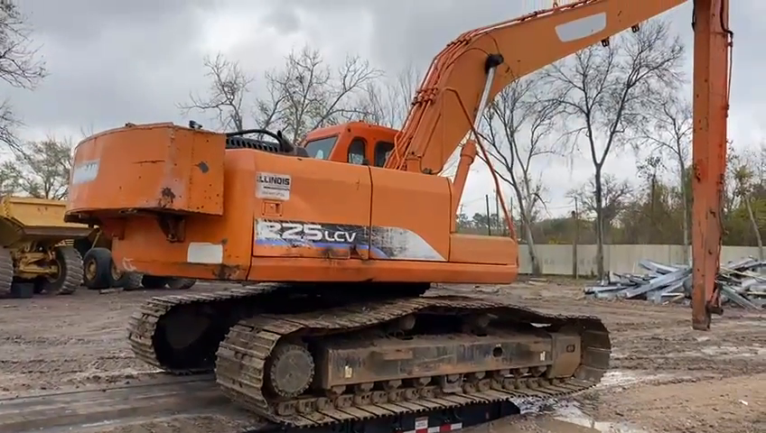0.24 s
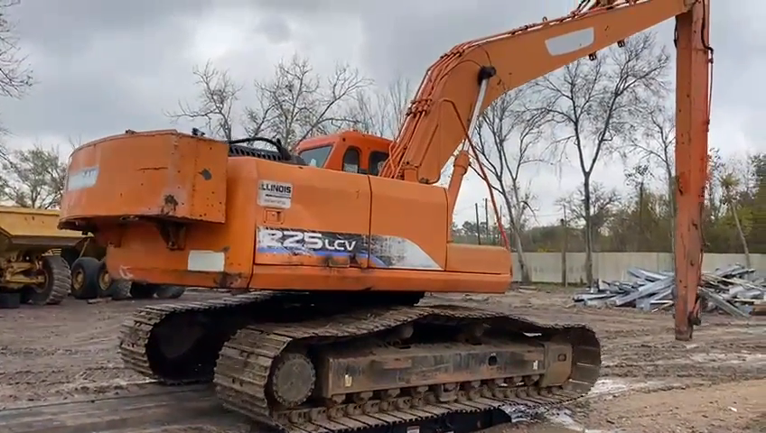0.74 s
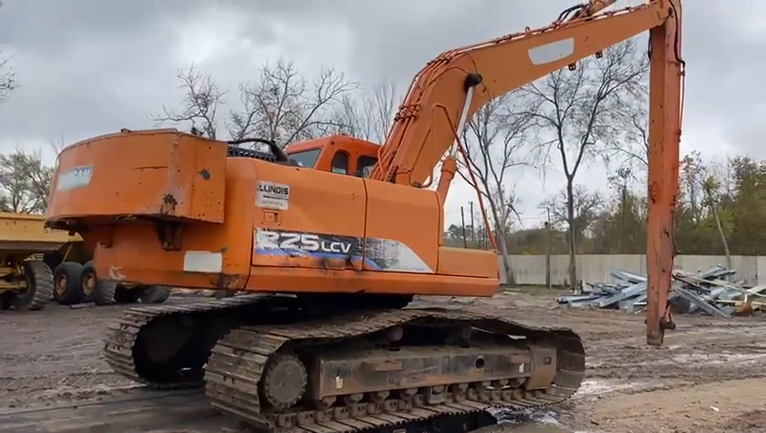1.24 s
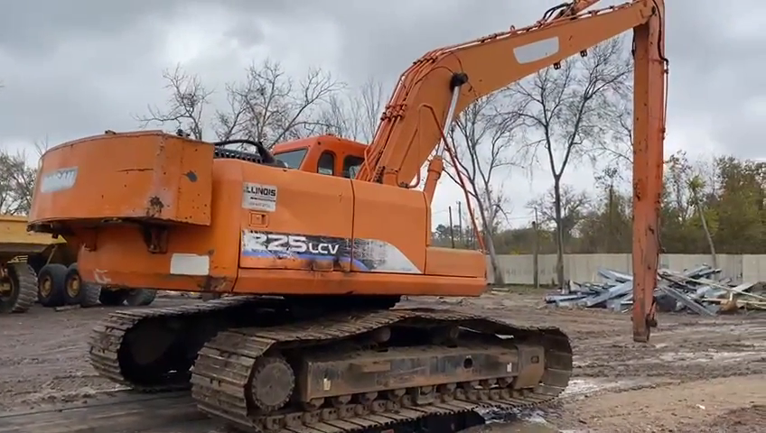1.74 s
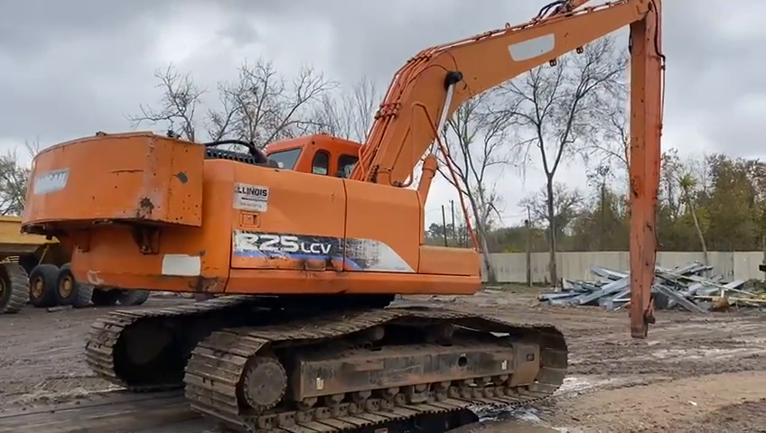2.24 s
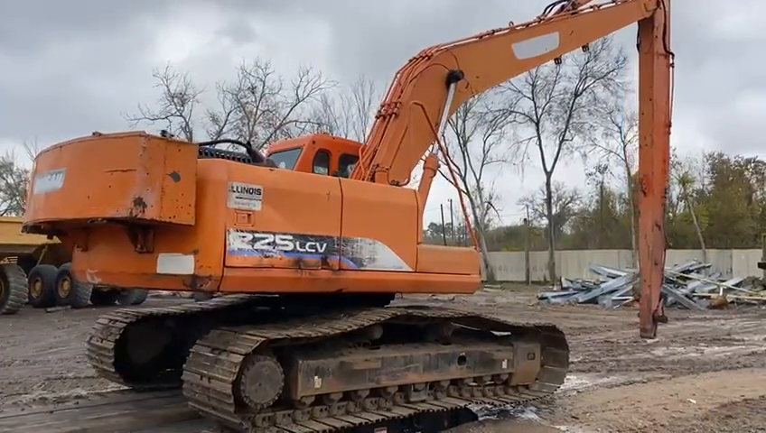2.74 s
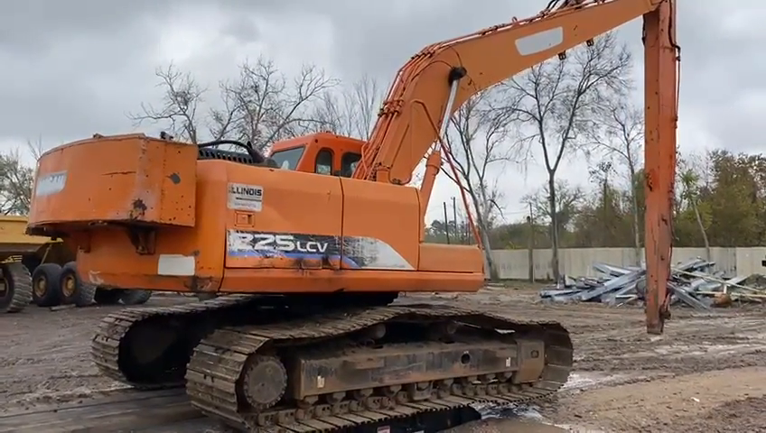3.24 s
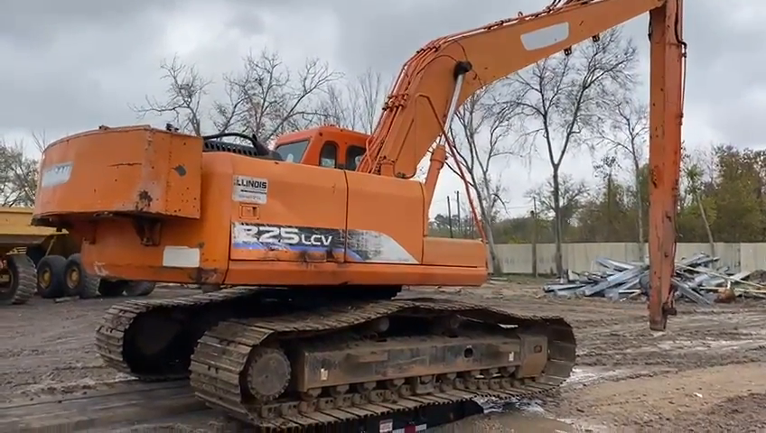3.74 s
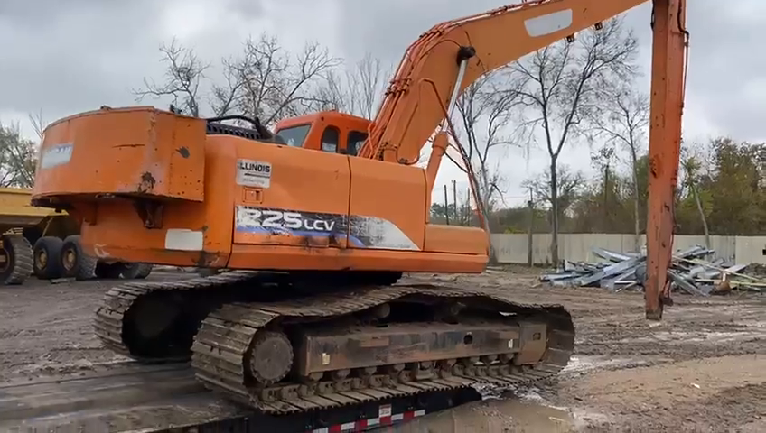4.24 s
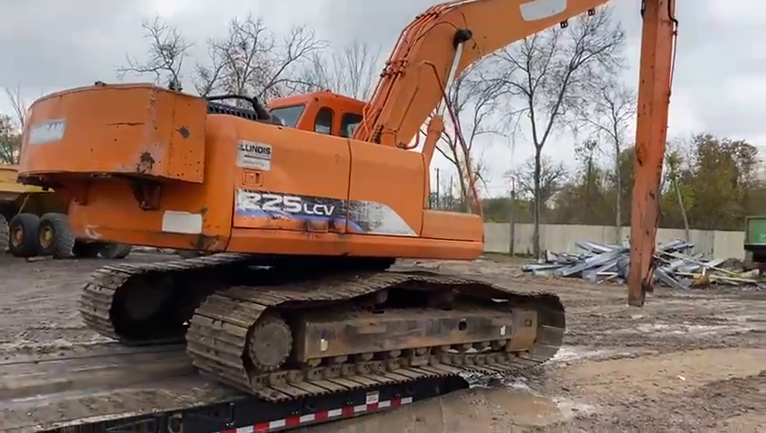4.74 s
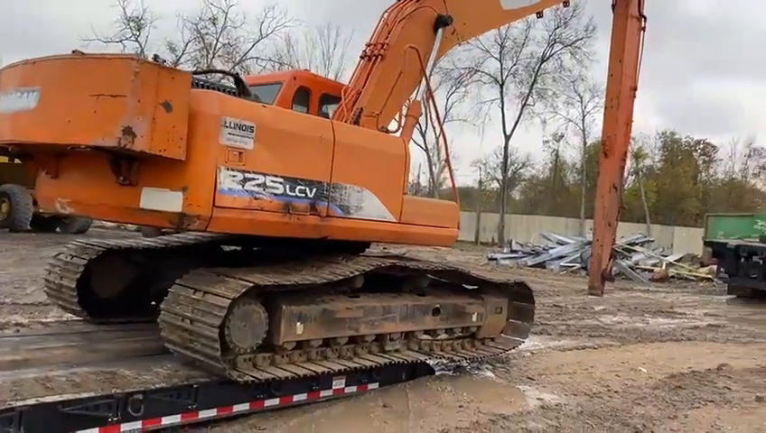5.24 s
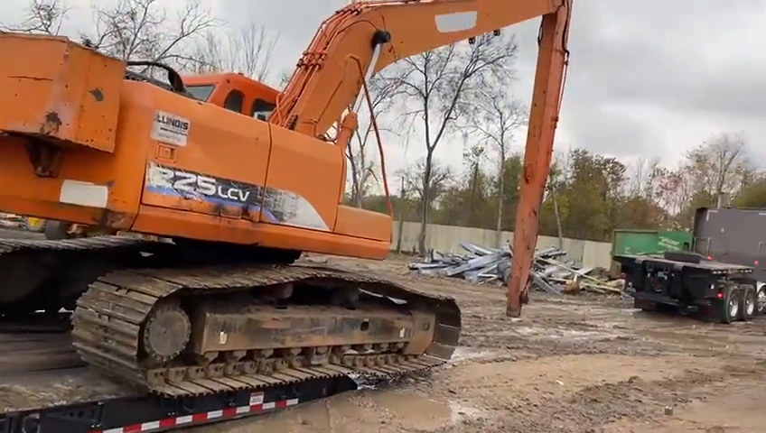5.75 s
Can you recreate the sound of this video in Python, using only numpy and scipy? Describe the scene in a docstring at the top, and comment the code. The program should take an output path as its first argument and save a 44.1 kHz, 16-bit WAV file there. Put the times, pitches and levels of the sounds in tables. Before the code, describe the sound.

A heavy diesel engine runs at constant speed for the whole six seconds: low fan roar, slightly uneven exhaust throbbing and a steady pump hum, outdoors and fairly close, in stereo. A light clank at 0.3 seconds leads to a dense, loud clatter of track steel from 0.64 to 0.9, with hollow deck booms and a brief thin plate ring. Another hard clank lands at 1.1, then smaller ticks fade by 1.6. From there a faint, wavering hydraulic whine rises over the engine. At 2.85 the track drops with a sharp clank and the whine turns lower, fading around 3.5. A deep soft boom at 4.3 accompanies a short second whine, and knocks follow at 4.6 to 4.7. From 5.0 onward rumble and gritty grinding swell, with clustered clanks near 5.3, deep thumps, and duller blows from 5.6 to 5.9.

```python
"""An open yard: a six-cylinder diesel excavator crawls off a low trailer, heard through a two-port microphone.
Noise makes the fan roar, sines the shaft orders, pump hum and track-motor whine; filtered pulses thump
in the exhaust. Coloured noise grinds and rumbles as the weight shifts, dying rings let the deck boom
and thin plates sing, and bursts of noise through steel resonances let the track shoes clank."""
import sys
import numpy as np
from scipy import signal
from scipy.fft import rfft, irfft, next_fast_len
from scipy.io import wavfile
from scipy.ndimage import uniform_filter1d

SR = 44100
rng = np.random.default_rng(int(sys.argv[2]) if len(sys.argv) > 2 else 0)


def nominal_scale(level):
    """Amplitude ratio for a level in decibels (scalar or array-like)."""
    x = np.asarray(level, float) / 20
    return 10 ** x


def master_out(mix):
    """Clip the mix to full scale and print it as 16-bit PCM to the path in sys.argv[1]."""
    frames = np.transpose(np.atleast_2d(mix))
    ceiling = np.clip(frames, -1, 1)
    pcm = np.round(ceiling * 32767).astype(np.int16)
    wavfile.write(sys.argv[1], SR, pcm)


N = 265021
T = np.arange(N) / SR
TURN_HZ, PISTON_HZ = 23.44, 370  # engine shaft; settled piston rate of the track motor

# fan and engine block roar: f/Hz, relative level/dB
ROAR_SPECTRUM = [(15, -46), (25, -46), (55, -3), (120, -1.5), (225, -19.5), (290, -29), (480, -55),
                 (1000, -18.5), (2000, -29), (4000, -78), (8000, -40), (11500, -45.5), (13000, -89)]
# engine and pump tones: multiple of the shaft turn, relative level/dB
SHAFT_ORDERS = [(1, -22), (2, -31), (3, -2.5), (4, 3.5), (5, 7), (6, -2.5), (7, -35), (8, -5.5), (9, -20),
                (11, -0.5), (12, 4.5), (13, -1), (15, -4.5), (16, -6), (17, -7.5), (19, -15.5), (20, -19),
                (24, -6.5), (25, -13.5)]
# six cylinders in firing order, one thumps hardest: relative level/dB
CYLINDER_LEVELS = [-0.5, 2, 4, -3, 2.5, -29]
# exhaust resonances: f/Hz, width/Hz, relative level/dB
EXHAUST_MODES = [(110, 97, 0), (281, 76, -16.5)]
# crawling over the deck, three colours of noise: f/Hz, relative level/dB
RUMBLE_SPECTRUM = [(30, -58), (60, 2), (110, 1), (200, -3.5), (320, -9.5), (500, -50)]
GRIND_SPECTRUM = [(200, 1.5), (400, 6.5), (800, 2), (1500, -6.5), (2500, -31)]
GRIT_SPECTRUM = [(1200, -3.5), (2200, 0), (4500, -6), (8000, -15.5), (11500, -34), (13000, -44)]
# rows rumble, grind, grit: level at load 0/dB, slope/dB per dB of load, rise while the motor pulls/dB
CRAWL_LEVELS = [(-26.5, 1.19, 0), (-33, 1.165, 1), (-40.5, 1.04, 2)]
# weight shifting on the trailer: t/s, load/dB
WEIGHT_SHIFT = [(0, 1), (.37, 0), (.67, 3), (1.0, 2.5), (1.4, 1), (2.3, 0), (3.0, 1), (3.4, 0.5), (3.9, 1),
                (4.5, 2.5), (5.0, 5.5), (5.3, 6.5), (5.75, 6.5), (6.0, 6)]
# pulls of the track motor: start t/s, let-go t/s, level/dB, excess piston rate at the start f/Hz, settling t/s
MOTOR_PULLS = [(1.618, 3.197, -50, 10, .3), (4.175, 4.602, -52, 4.2, 0.34)]
# whine: multiple of the piston rate, level/dB, slope/dB per dB of shrillness,
# level change once the track settles/dB (the fifth multiple swells, the others fade)
WHINE_TONES = [(3, 12, .1, -3), (5, 0, .1, 7), (8, 3.5, 1.5, -20), (9, -1.5, .2, -20)]
# how shrill the whine is: t/s, shrillness/dB
SHRILLNESS = [(1.6, -10), (1.85, -5), (2.02, 1), (2.14, -2), (2.22, 2.5), (2.36, 2.5), (2.46, -3),
              (2.57, -1.5), (2.65, 3), (2.79, 2), (2.84, -2), (4.2, 0), (4.28, 4), (4.42, -6), (4.7, -10)]
# the track drops into place and the whine turns lower: fade-in start and end t/s, fade-out start and end t/s
SETTLED_TIMES = (2.83, 2.88, 3.6, 3.7)
# ringing modes of the trailer deck and, from 3400 Hz up, of thin loose plates: f/Hz, relative level/dB, t60/s
DECK_MODES = [(75, 6.5, 0.1), (101, 1.5, 0.16), (111.3, 0, 0.11), (143, -0.5, 0.16), (170.3, 0.5, 0.19),
              (190, -7, 0.18), (216, -5.5, 0.51), (252, 0, 0.29), (315, 2, 0.2), (346, -2, 0.35),
              (440, -3, .2), (3400, 4, 0.14), (4180, -9, 0.17), (7380, -5.5, 0.3)]
# blows on the deck and plates: t/s, level/dB, centre f/Hz, spread/octaves, rise t/s
DECK_BLOWS = [(0.661, -5, 110, .15, 0.015), (.722, -6.5, 300, 0.74, 0.0046), (0.727, 0, 130, 0.39, 0.0072),
              (0.772, -11, 292, 0.48, 0.0048), (0.801, -8, 128, 0.56, 0.005),
              (0.789, -20, 7380, 0.23, 0.011), (.83, -23, 3400, .4, 0.0096),
              (0.991, -6.5, 130, 0.49, 0.015), (1.012, -8.5, 198, 0.32, 0.0057),
              (1.03, -10.5, 190, 0.77, 0.0056), (1.052, -7.5, 113, 0.25, 0.0031),
              (1.079, -13.5, 263, .3, .004), (1.343, -12, 135, .15, .0055), (2.86, -6, 216, .08, 0.0039),
              (4.293, 4, 104, 0.087, 0.026), (5.061, -5, 101, .08, 0.05), (5.13, -6.5, 75, .1, 0.018),
              (5.258, -1, 123, 0.21, 0.027), (5.384, 4, 101, 0.075, 0.036), (5.618, -10, 111, 0.16, 0.014),
              (5.612, -3.5, 440, .1, .004), (5.642, -13.5, 440, .1, .004), (5.739, -10, 157, 0.21, 0.0021),
              (5.803, -3, 113, 0.12, 0.015), (5.881, -8, 110, .15, 0.0057)]
# ringing modes of the track steel: f/Hz, width/Hz, relative level/dB
STEEL_MODES = [(362, 59, 11), (437.5, 18, 11), (470, 28, -2), (573, 54, 4.5), (654, 29, 3), (686, 51, -2),
               (744, 22, 1.5), (800, 41, -3), (855, 36, -3), (917, 43, -2), (960, 39, 2.5),
               (1057, 36, -4.5), (1179, 63, -6), (1274, 59, -6), (1380, 18, 1), (1565, 21, -1),
               (1795, 29, 3), (1970, 44, -2), (2094, 35, 1), (2190, 28, -5), (2298, 30, 0.5),
               (2710, 60, -3), (3400, 28, 9.5), (3120, 54, 3), (3770, 78, 2), (4210, 82, 1),
               (4400, 120, -6), (5170, 110, -0.5), (5800, 40, -21)]
# track shoe blows: t/s, level/dB, strongest ring f/Hz, upper ring f/Hz,
# tilt near 2 kHz/dB, tilt near 5 kHz/dB, rattle t60/s
SHOE_BLOWS = [(0.323, -18.5, 686, 1274, -15, -27, 0.097), (0.64, -12, 573, 2094, -12, -47, 0.18),
              (0.723, -3, 1179, 4400, -10, -21, 0.14), (0.732, 0, 744, 1179, -6, -25, 0.3),
              (0.747, -8, 1057, 1970, 5, -14, 0.27), (0.769, -6.5, 744, 1179, -6, -23, 0.37),
              (0.8, -2, 1274, 4210, 0.5, -14.5, 0.19), (0.817, -5, 744, 3400, -25, -31, 0.18),
              (0.849, -9, 654, 2094, -3, -26, 0.23), (0.887, -16.5, 573, 4400, -20, -15, 0.082),
              (1.1, 3, 686, 960, -9.5, -27, 0.057), (1.112, -4, 686, 744, -11, -41, 0.068),
              (1.125, -11, 1380, 2190, -14, -43, 0.14), (1.138, -7.5, 744, 2298, -13, -55, 0.21),
              (1.152, -20, 1380, 2190, -8, -49, 0.12), (1.211, -14.5, 1274, 5800, -22, -10.5, 0.12),
              (1.222, -12, 654, 1380, -5, -24, 0.094), (1.234, -21, 1274, 2190, -17, -23, 0.1),
              (1.25, -28, 855, 2190, -8, -25, 0.079), (1.349, -17.5, 744, 2710, -9, -23, 0.095),
              (1.378, -21, 744, 2710, -9, -23, 0.13), (1.42, -18, 437.5, 3120, -6, -22, 0.079),
              (1.625, -27, 1380, 2710, -4, -15, 0.14), (1.85, -29, 1380, 2298, -7, -20, 0.087),
              (2.843, -10, 1179, 5800, -9, 3, 0.16), (2.847, 2, 686, 1057, -9, -25, 0.14),
              (2.889, -12.5, 855, 1380, -9, -29, 0.24), (4.222, -25.5, 1057, 1795, -5, -23, 0.98),
              (4.577, -12.5, 1179, 1795, -7, -20, 0.083), (4.618, -20, 1179, 3120, -8, -21, 0.068),
              (4.697, -9.5, 1057, 2298, 0, -10, 0.078), (4.707, -5, 1179, 1795, -5, -17.5, 0.16),
              (4.888, -19.5, 744, 2094, -4, -15, 0.051), (5.047, -17.5, 744, 1970, -13, -24, 0.38),
              (5.088, -16.5, 917, 4210, -18, -21, 0.14), (5.26, -8, 917, 5170, -11, -13, 0.044),
              (5.273, -4.5, 686, 5800, -4, -8, 0.05), (5.29, -12, 744, 1179, 0, -10, 0.28),
              (5.315, -9.5, 744, 2094, -18, -17, 0.42), (5.358, -11, 654, 5170, -3, -7, 0.17),
              (5.383, -23, 917, 5170, -7, -4, 0.091), (5.41, -15.5, 744, 1274, -27, -32, 0.071),
              (5.615, -5.5, 573, 1274, -22, -41, 0.11), (5.626, -10, 470, 800, -15, -38, 0.1),
              (5.645, -8, 437.5, 573, -24, -38, 0.096), (5.66, -8, 470, 960, -21, -40, 0.065),
              (5.74, -9.5, 686, 1057, -19, -34, 0.12), (5.748, -9.5, 744, 2190, -9.5, -26, 0.13),
              (5.795, -14.5, 686, 1057, -20, -37, 0.12), (5.856, -12.5, 437.5, 1380, -10, -27, 0.31)]
# shared part of the stereo sound, nearly empty near 9 kHz: f/Hz, gain/dB
ALIKE_RESPONSE = [(20, -0.5), (8000, -4), (8350, -19.5), (9500, -33.5), (9900, -5.5), (11600, -5),
                  (11950, -77)]
# part that differs between left and right, nearly empty near 7 kHz: f/Hz, gain/dB
UNLIKE_RESPONSE = [(25, -19), (60, -23), (190, -18.5), (350, -10), (630, -8), (2050, -4), (3700, -8),
                   (5000, -10), (6100, -5), (6400, -46), (7400, -39), (7800, -6.5), (10000, -1.5),
                   (10450, -43), (12300, -70)]


def level(x, db):
    """Scale to an rms level."""
    return x * nominal_scale(db) / np.sqrt(np.mean(x ** 2))


def shape(hz, points):
    """Gain at hz, drawn through (f/Hz, gain/dB) points on a log frequency axis."""
    f, db = np.transpose(points)
    return nominal_scale(np.interp(np.log(hz + 1), np.log(f), db))


def colour(x, points):
    """Filter a full-length sound by a spectrum."""
    n = next_fast_len(N, True)
    f = np.arange(n // 2 + 1) * SR / n
    return irfft(rfft(x, n) * shape(f, points), n)[..., :N]


def walk(rate):
    """Slow random wander: a new level every 1 / rate s, smoothed twice; spread near 1."""
    hold = int(SR / rate)
    steps = np.repeat(rng.standard_normal(N // hold + 1), hold)
    return 1.3 * uniform_filter1d(uniform_filter1d(steps, hold), hold)[:N]


def tones(phase, table, waver_db, rate):
    """Sines on multiples of a phase, each wavering alone; its start phase differs between the two rows."""
    total = np.zeros((2, N))
    for multiple, db in table:
        start_phase = rng.uniform(0, 2 * np.pi, (2, 1))
        total += nominal_scale(db + waver_db * walk(rate)) * np.sin(multiple * phase + start_phase)
    return total


def add(out, s, x):
    """Mix x into out from time s."""
    i = int(s * SR)
    out[:, i:i + x.shape[1]] += x[:, :N - i]


def fan_roar(turn):
    """Fan and block noise that puffs once a firing and, more faintly, once a turn."""
    puff = 1 + 0.28 * np.sin(3 * turn) + 0.076 * np.sin(turn)
    flutter = nominal_scale(0.5 * walk(24.95))
    return level(colour(puff * flutter * rng.standard_normal((2, N)), ROAR_SPECTRUM), -28.5)


def exhaust():
    """One pulse a firing, uneven from cylinder to cylinder, excites the resonances of the pipe."""
    # three firings a turn, so the six-cylinder pattern repeats every two turns
    times = np.arange(0.078, T[-1], 1 / (3 * TURN_HZ))
    scatter_db = 5.9 * rng.standard_normal((len(times), 2)).T
    firings = np.zeros((2, N))
    firings[:, (times * SR).astype(int)] = nominal_scale(np.resize(CYLINDER_LEVELS, len(times)) + scatter_db)
    f = np.arange(N // 2 + 1) * SR / N
    pipe = sum(nominal_scale(db) * 1j * f * w / (hz ** 2 - f ** 2 + 1j * f * w) for hz, w, db in EXHAUST_MODES)
    thumps = irfft(rfft(firings) * pipe * shape(f, [(400, 11), (1000, -45)]), N)
    return level(thumps, -33)


def engine():
    """Shaft orders and pump hum lock to one slightly wandering turn, which also puffs the roar."""
    turn = 2 * np.pi * np.cumsum(TURN_HZ * (1 + 0.0011 * walk(1.988))) / SR
    hum = nominal_scale(-34) * tones(turn, SHAFT_ORDERS, waver_db=1.7, rate=14)
    return fan_roar(turn) + exhaust() + hum


def pulling(start, end):
    """Effort from 0 to 1: the motor takes up the load at start and lets it go from end on."""
    attack_s, release_s = 0.068, 0.42
    ramp = np.minimum((T - start) / attack_s, (end - T) / release_s + 1)
    return np.clip(ramp, 0, 1) ** 2


def crawl():
    """Deck rumble and shoes grinding over grit: unevenly wavering noise that swells with load and pull."""
    load = np.interp(T, *np.transpose(WEIGHT_SHIFT))
    pull = sum(pulling(start, end) for start, end, *_ in MOTOR_PULLS)
    spectra = (RUMBLE_SPECTRUM, GRIND_SPECTRUM, GRIT_SPECTRUM)
    total = np.zeros((2, N))
    for spectrum, (db, slope, pull_db), grain_db in zip(spectra, CRAWL_LEVELS, (1.5, 1.2, 0.7)):
        grains = nominal_scale(grain_db * walk(40)) * rng.standard_normal((2, N))
        swell = nominal_scale(db + slope * load + pull_db * pull)
        total += swell * level(colour(grains, spectrum), 0)
    return total


def motor():
    """Piston ripple rings the frame on a few multiples; the pump feeds it unevenly once a shaft turn."""
    hz = np.full(N, float(PISTON_HZ))
    effort = np.zeros(N)
    for start, end, db, excess_hz, settle_s in MOTOR_PULLS:
        hz += excess_hz * np.exp(-np.abs(T - start) / settle_s)
        effort += nominal_scale(db) * pulling(start, end)
    phase = 2 * np.pi * np.cumsum(hz * (1 + 0.003 * walk(40))) / SR
    feed = np.sqrt(2) * (1 + 0.25 * np.sin(2 * np.pi * TURN_HZ * T))
    shrill = np.interp(T, *np.transpose(SHRILLNESS))
    settled = np.interp(T, SETTLED_TIMES, [0, 1, 1, 0])
    whine = [(k, db + slope * shrill + after_db * settled) for k, db, slope, after_db in WHINE_TONES]
    return feed * effort * tones(phase, whine, waver_db=1.6, rate=17)


def booms():
    """Each blow rings the modes near its centre, and they die away: low ones in the deck, high ones in thin plates."""
    out, t = np.zeros((2, N)), T[:16384]
    pitch, gain_db, t60 = np.transpose(DECK_MODES)[:, :, None]
    rings = np.exp((2j * np.pi * pitch - np.log(1000) / t60) * t)
    for s, db, hz, spread, rise in DECK_BLOWS:
        nearness = np.exp(-(np.log2(pitch.T / hz) / spread) ** 2)
        start_phase = np.exp(2j * np.pi * rng.random((2, len(DECK_MODES))))
        struck = nominal_scale(gain_db.T) * nearness * start_phase
        add(out, s, nominal_scale(db) * (1 - np.exp(-t / rise)) * (struck @ rings).imag)
    return out


def clanks():
    """Each shoe blow is a dying rattle of contacts that rings all the steel, most of all near two pitches."""
    out, t = np.zeros((2, N)), T[:16384]
    f = np.arange(len(t) // 2 + 1) * SR / len(t)
    pitch, width, gain_db = np.transpose(STEEL_MODES)
    modes = width[:, None] / (width[:, None] + 2j * (f - pitch[:, None]))
    rise = 1 - np.exp(-(t / 0.005) ** 2)
    scatter_db, grit_db, near, favour = 1.5, 2.0, 0.02, 1.5  # near: distance in log frequency
    crest = 3.31  # peak over rms in the first 23 ms
    for s, db, hz, upper_hz, mid_db, top_db, t60 in SHOE_BLOWS:
        grit = nominal_scale(grit_db * rng.standard_normal(len(t) // 96 + 1).repeat(96)[:len(t)])
        contacts = grit * rng.standard_normal((2, len(t)))
        decay = np.exp(-t * np.log(1000) / t60) + 0.086 * np.exp(-t / 0.063)
        rattle = rfft(contacts * rise * decay)
        favoured = 1 + sum(favour / (1 + (np.log(pitch / ring) / near) ** 2) for ring in (hz, upper_hz))
        struck = nominal_scale(gain_db + scatter_db * rng.standard_normal(len(pitch))) * favoured
        tilt = shape(f, [(0.022 * hz, -26), (0.58 * hz, -10), (hz, 0), (2100, mid_db), (5000, top_db),
                         (11500, top_db - 9.0)])
        # 1.17 is the bare contact noise beside the ringing
        x = irfft(rattle * (1.17 + struck @ modes) * tilt, len(t))
        x *= nominal_scale(db) / (crest * x[:, :1024].std(axis=1, keepdims=True))
        add(out, s - 0.005, x)  # starts early by its rise
    # a blow comes from one spot, so the ports differ less
    return out * nominal_scale(np.array([[0], [-3.0]]))


def scene():
    """Every source has a row heard alike by both ports and a row that differs; sum and difference are the ports."""
    alike, unlike = engine() + crawl() + motor() + booms() + clanks()
    alike, unlike = colour(alike, ALIKE_RESPONSE), colour(unlike, UNLIKE_RESPONSE)
    return np.array([alike + unlike, alike - unlike])


def low_pass(x):
    """Removes everything above the highest recorded frequency."""
    return signal.sosfilt(signal.butter(12, 12580, fs=SR, output="sos"), x)


def record(dry):
    """Soft saturation rounds the loudest blows a little."""
    mix = np.tanh(0.82 * dry) / 0.89
    return low_pass(mix)


dry = scene()
out = record(dry)
master_out(out)
```